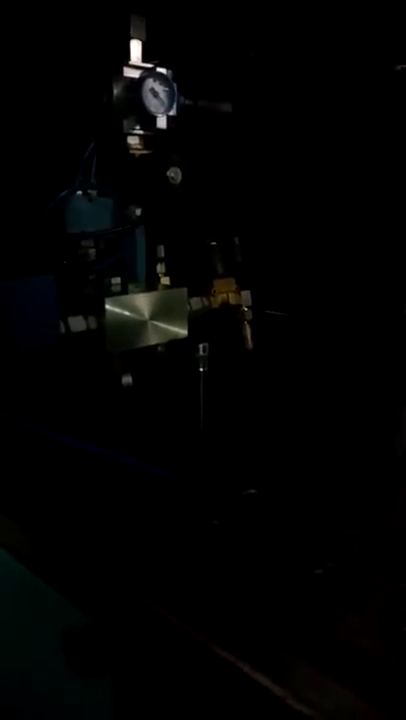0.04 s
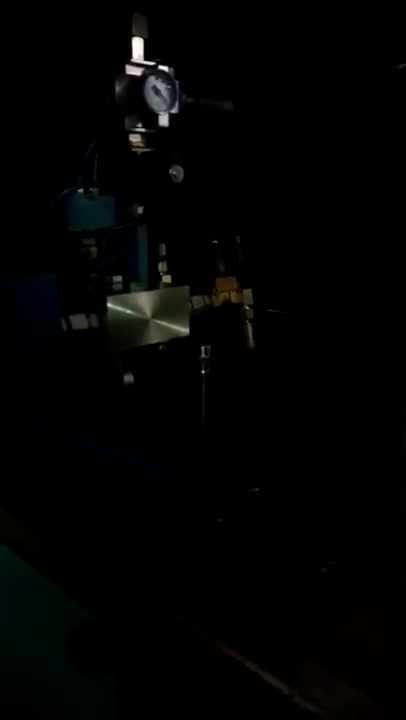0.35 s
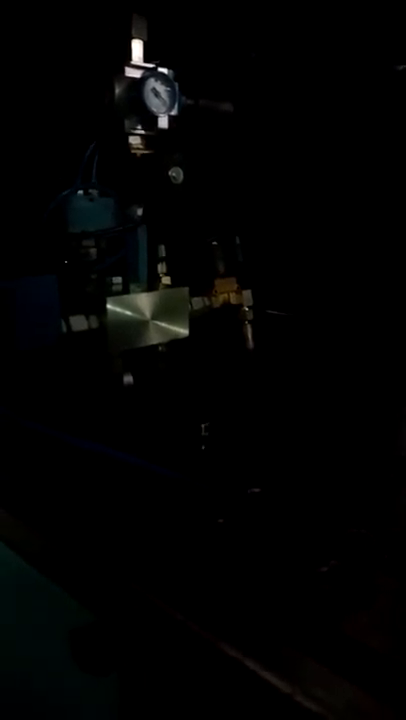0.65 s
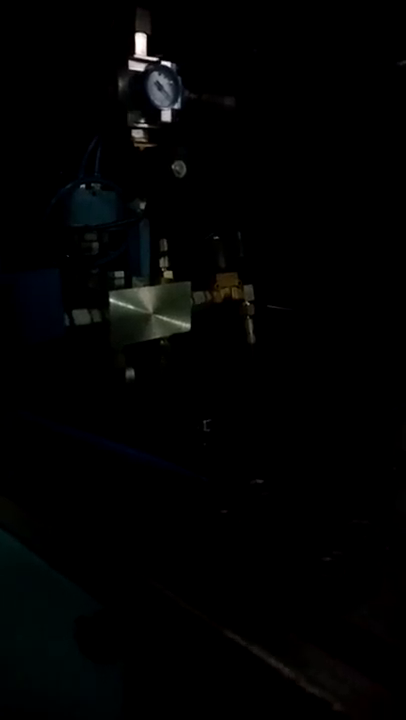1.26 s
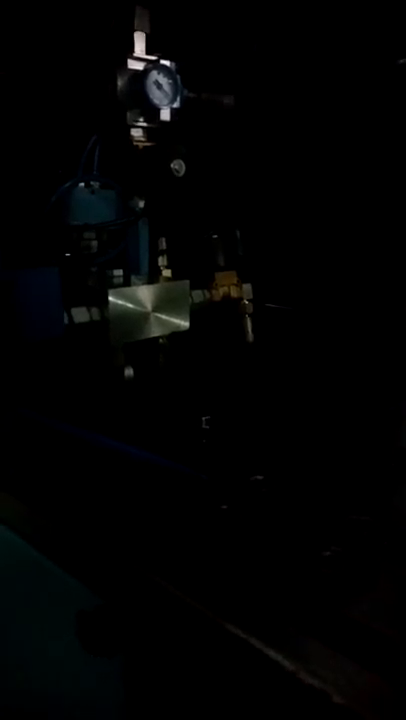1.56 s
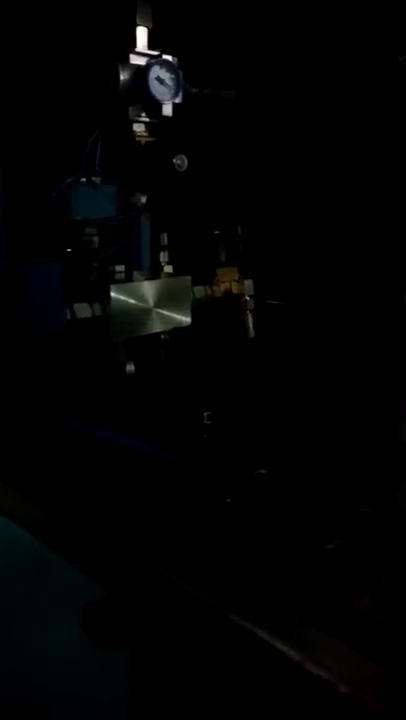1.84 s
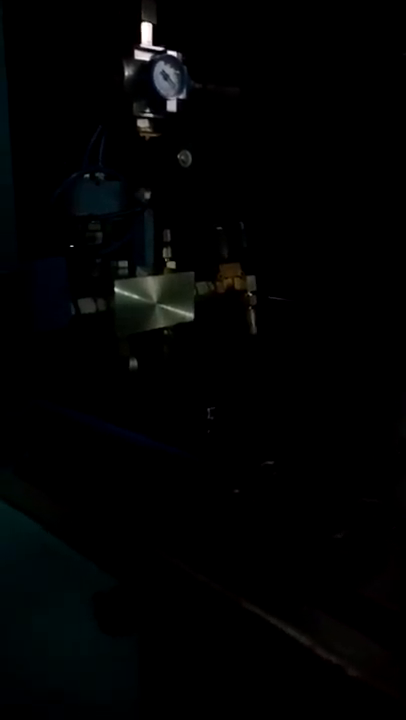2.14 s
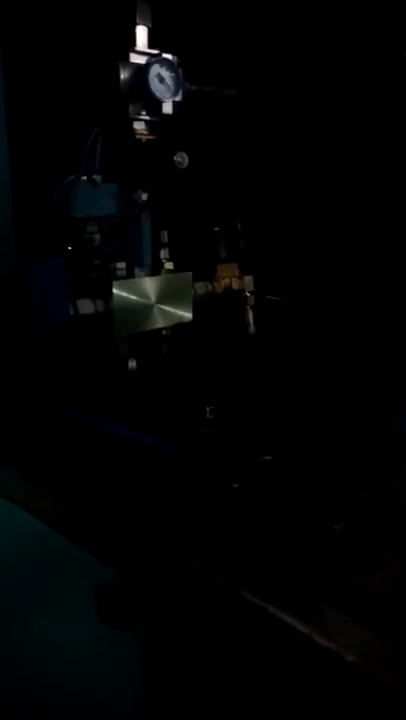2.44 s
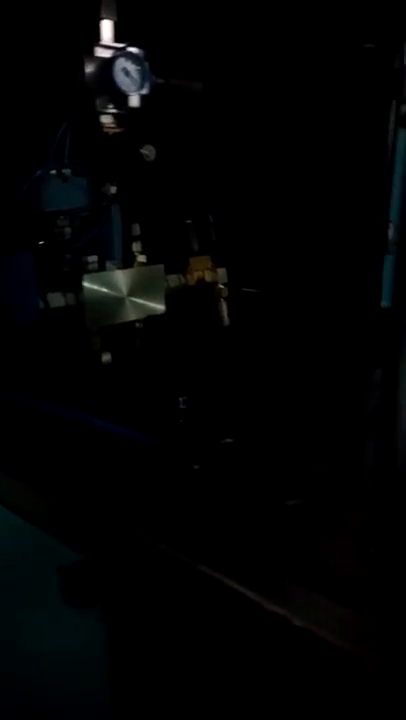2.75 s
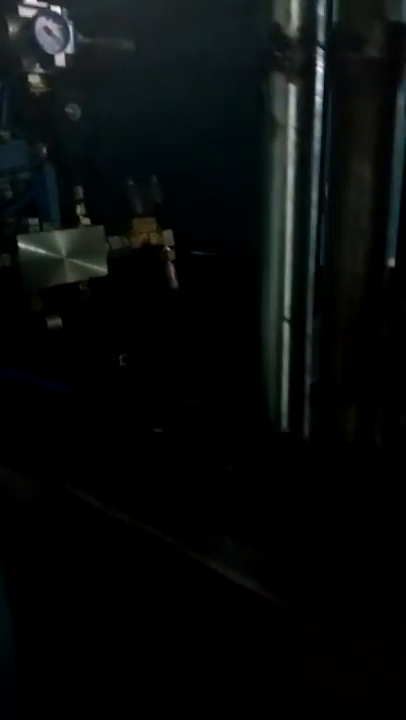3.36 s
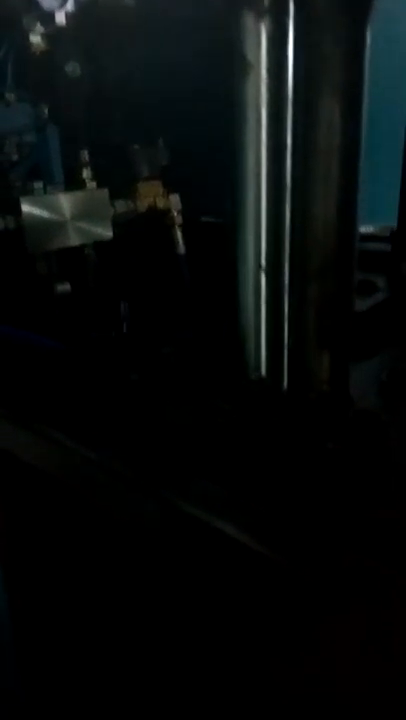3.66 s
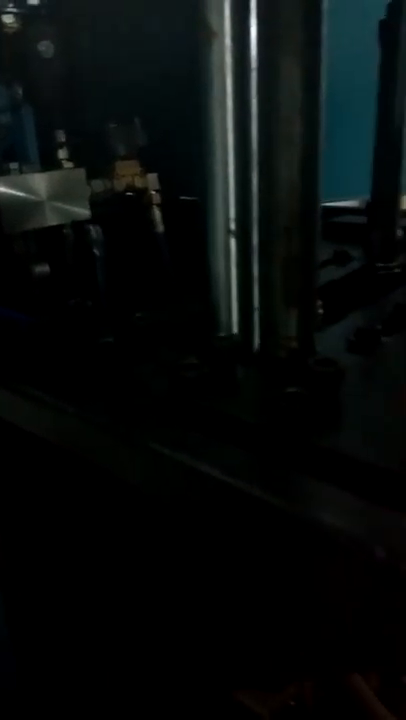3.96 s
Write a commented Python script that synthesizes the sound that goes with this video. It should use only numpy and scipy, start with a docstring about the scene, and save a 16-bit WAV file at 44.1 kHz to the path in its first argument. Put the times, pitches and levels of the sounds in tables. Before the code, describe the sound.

A pneumatic press hisses in sharp bursts and clanks over a low motor drone.

```python
"""Air rushes through pipes, then bursts hissing from valves: a pneumatic press works one cycle, close by.
The ram lands on its bed, the frame knocks and steel parts clank, each blow a short rattle and a ring.
Behind it a motor drones under load and a fitting leaks, in a reverberant factory hall.
The strongest exhaust, near the end, blows on one of the two microphone ports."""
import sys
import numpy as np
from scipy import signal
from scipy.fft import rfft, irfft
from scipy.io import wavfile

SR = 44100
rng = np.random.default_rng(int(sys.argv[2]) if len(sys.argv) > 2 else 0)


def generate_wav(signal):
    """Clip the signal to [-1, 1] and save it as 16-bit WAV at the path in sys.argv[1]."""
    frames = np.transpose(np.atleast_2d(signal))
    scaled = np.clip(frames, -1, 1) * 32767
    pcm = np.round(scaled).astype(np.int16)
    wavfile.write(sys.argv[1], SR, pcm)


N = 176400

# The dull rattle of ram and frame. Each row: frequency in Hz, relative level in dB.
THUD_SPECTRUM = [(30, -38), (70, -19), (130, -1), (210, -7), (400, 1), (600, -8), (850, -5), (1200, -9.5),
                 (1600, -9.5), (2500, -10), (4500, -18), (8000, -16), (15000, -49)]
# How long it lasts. Each row: frequency in Hz, seconds to fall 60 dB.
THUD_DECAY = [(100, 0.328), (500, 0.1525), (2000, 0.163), (10000, 0.0595)]


def amp(db):
    """Decibels to gain."""
    return 10 ** (np.asarray(db) / 20)


def unit_rms(x):
    """Scales to rms 1."""
    return x / np.sqrt(np.mean(x ** 2) + 1e-20)


def curve_at(points, hz):
    """Reads a table on a logarithmic frequency axis."""
    point_hz, value = np.transpose(points)
    return np.interp(np.log(hz + 1), np.log(point_hz + 1), value)


def fader(points):
    """Gain over the whole scene from (s, dB) points."""
    return amp(np.interp(np.arange(N) / SR, *np.transpose(points)))


def add(mix, start, sound):
    """Mixes a sound in at start seconds."""
    part = mix[:, max(round(start * SR), 0):][:, :sound.shape[1]]
    part += sound[:, :part.shape[1]]


def noise(spectrum, size, tilt_db=0):
    """Two unrelated coloured noises of rms 1, tilted by tilt_db per octave."""
    hz = np.fft.rfftfreq(size, 1 / SR)
    colour = amp(curve_at(spectrum, hz) + tilt_db * np.log2(np.maximum(hz, 100) / 1000))
    return unit_rms(irfft(rfft(rng.standard_normal((2, size))) * colour, size))


def wander(rate_hz, size):
    """Random drift of rms 1, mostly slower than rate_hz."""
    hz = np.fft.rfftfreq(size, 1 / SR)
    return unit_rms(irfft(rfft(rng.standard_normal(size)) / (1 + (hz / rate_hz) ** 2), size))


def damped(x, t60, stretch=1):
    """Lets each band die away at its own speed."""
    hz, t, bands = signal.stft(x, SR, nperseg=256)
    bands = bands * np.exp(-np.log(1000) * t / (stretch * curve_at(t60, hz)[:, None]))
    return signal.istft(bands, SR, nperseg=256)[1][:, :x.shape[1]]


def airflow(bursts, spectrum, close_s, flutter_db, flutter_hz):
    """A valve opens, the turbulent flow sags with the pressure (negative sag swells), the valve shuts."""
    out, t = np.zeros((2, N)), np.arange(SR) / SR
    for start, rise, length, db, sag, tilt in bursts:
        opening = np.minimum(t / rise, 1) * np.exp(-np.maximum(t - length, 0) / close_s)
        gain = amp(db - sag * np.minimum(t, length) + flutter_db * wander(flutter_hz, SR))
        add(out, start, opening * gain * noise(spectrum, SR, tilt))
    return out


def rattles(blows, spectrum, t60, rise_s=.00111):
    """Each blow wakes a dense, short rattle."""
    out, t = np.zeros((2, N)), np.arange(SR) / SR
    for start, db, stretch, tilt, _, _ in blows:
        rattle = damped(noise(spectrum, SR, tilt), t60, stretch)
        add(out, start, amp(db) * np.minimum(t / rise_s, 1) * rattle)
    return out


def rings(blows, modes, rise_s, focus_db, left_lag_s=.00004):
    """A blow starts all modes; the spot struck favours those near one pitch, by focus_db per octave."""
    out = np.zeros((2, N))
    t = np.maximum(np.arange(SR) / SR - np.array([[left_lag_s], [0]]), 0)
    for start, db, stretch, _, ring_db, centre_hz in blows:
        ring = 0
        for hz, mode_db, t60 in modes:
            gain = amp(mode_db - focus_db * abs(np.log2(hz / centre_hz)))
            ring += gain * np.exp(-np.log(1000) * t / (t60 * stretch)) * np.sin(2 * np.pi * hz * t)
        add(out, start, 2 * amp(db + ring_db) * np.minimum(t / rise_s, 1) * ring)
    return out


def hall(x, near_db, near_s=.0122, near_hz=1390):
    """Adds quick reflections from the machine itself, then the long tail of the hall."""
    # Each row: frequency in Hz, seconds to fall 60 dB.
    tail_t60 = [(100, 0.72), (400, 1), (1500, 0.914), (4000, 0.828), (9000, 0.56), (15000, 0.31)]
    # Each row: frequency in Hz, level in dB against the direct sound.
    tail_db = [(100, -14), (400, -10), (1500, -8), (4000, -10), (9000, -9.5), (15000, -21)]
    t, hz = np.arange(SR) / SR, np.fft.rfftfreq(SR, 1 / SR)
    echoes = rng.standard_normal((2, SR)) * (rng.random((2, SR)) < .05)
    echoes = echoes * np.exp(-t / near_s) * (t > .001)
    treble = amp(near_db) * hz / (hz - 1j * near_hz)  # small parts return only the treble
    near = (1 + treble * rfft(unit_rms(echoes)) / np.sqrt(SR)) / np.sqrt(1 + abs(treble) ** 2)
    tail = damped(rng.standard_normal((2, SR)), tail_t60) * np.minimum(t / .0201, 1)
    unit_energy = np.sqrt(2 * np.log(1000) / (SR * curve_at(tail_t60, hz)))
    tail = rfft(tail) * amp(curve_at(tail_db, hz)) * unit_energy
    return signal.fftconvolve(x, irfft(near + tail, SR), axes=1)[:, :N]


def microphone(x, airborne):
    """Two ports, alike in the bass for airborne sound; each channel subtracts the other port, delayed."""
    # Each row: frequency in Hz, delay in cycles.
    delay = [(0, 0), (2460, 1), (4980, 2), (7600, 3), (10450, 4), (13000, 5), (15400, 6), (22050, 9)]
    # Each row: frequency in Hz, share of the other port subtracted.
    crossfeed = [(20, .99), (2700, .99), (3600, .92), (5000, .55), (8000, .38), (15000, .28)]
    hz = np.fft.rfftfreq(N, 1 / SR)
    cycles = np.interp(hz, *np.transpose(delay))
    cross = np.clip(curve_at(crossfeed, hz), 0, .995)
    coherence = airborne * np.sinc(2.357 * cycles)
    blend, ports = np.arcsin(coherence) / 2, rfft(x)
    ports = np.cos(blend) * ports + np.sin(blend) * ports[::-1]
    channels = ports - cross * np.exp(-2j * np.pi * cycles) * ports[::-1]
    power = 1 + cross ** 2 - 2 * cross * coherence * np.cos(2 * np.pi * cycles)
    return irfft(channels / np.sqrt(power), N)


def room_tone():
    """The steady wash of noise in the hall."""
    # Each row: frequency in Hz, relative level in dB.
    spectrum = [(25, -24.5), (60, -7), (140, -6.5), (350, -3.5), (700, -2.5), (1300, -10.5), (2000, -1.96),
                (3500, -5.5), (5500, -16.5), (8000, -5), (11000, -17.5), (15000, -21.5)]
    return amp(-43) * noise(spectrum, N)


def motor(waver=.014, rumble_db=-1):
    """Rumble and wavering hum that follow the load."""
    # Each row: time in seconds, level in dB.
    load = [(0, -48.5), (.4, -57), (.52, -38), (.7, -35.5), (.9, -31.5), (1.2, -42), (1.75, -39.5),
            (2.05, -32.5), (2.3, -41.5), (2.78, -39), (2.98, -52.5), (3.85, -52), (4, -44.5)]
    # The rumble. Each row: frequency in Hz, relative level in dB.
    spectrum = [(25, -40.5), (60, -22), (130, -3.5), (300, -1.5), (550, -8.5), (1000, -7), (2000, -16),
                (5000, -17), (15000, -52.5)]
    # Each row: pitch in Hz, level in dB against the load level.
    tones = [(57, -14), (134.6, -13), (170, -12), (240, -16), (296, -14), (1104, -15)]
    hum = 0
    for hz, db in tones:
        pitch = hz * (1 + waver * wander(5.86, N))
        hum += amp(db) * np.sin(2 * np.pi * (np.cumsum(pitch) / SR + rng.random((2, 1))))
    return fader(load) * (amp(rumble_db) * noise(spectrum, N) + np.sqrt(2) * hum)


def leak():
    """A thin hiss from a fitting that grows as pressure builds."""
    # Each row: time in seconds, level in dB.
    swell = [(0, -35.5), (.3, -30.5), (.7, -29), (.85, -41), (1.3, -39.5), (2.1, -36.5), (2.35, -35.5),
             (2.6, -32.5), (2.77, -29.3), (2.92, -39), (3.2, -46), (4, -47)]
    # Each row: frequency in Hz, relative level in dB.
    spectrum = [(40, -28.5), (500, -10), (1000, -3), (1900, 0.5), (2950, -3), (3330, 3), (3700, -3),
                (4200, -6), (5300, -5), (7200, 0), (9000, -4), (12000, -8.5), (15000, -8.5)]
    return fader(swell) * noise(spectrum, N) * amp(.5 * wander(26, N))


def gust():
    """Exhaust air buffets the left microphone port."""
    # Start, rise and length in seconds, level in dB, sag in dB per second, tilt in dB per octave.
    burst = (3.367, 0.0034, 0.285, -12.4, 2.5, 0.2)
    # Each row: frequency in Hz, relative level in dB.
    spectrum = [(25, -17), (60, -9.5), (120, 0.5), (220, 1), (400, -5), (700, -7), (1200, -10.5),
                (2500, -20.5), (6000, -19.5), (15000, -48)]
    buffet = airflow([burst], spectrum, close_s=.013, flutter_db=1.92, flutter_hz=71.3)
    return buffet * np.array([[np.sqrt(2)], [0]])


def frame_knocks():
    """The ram knocks the frame: returns the dull rattle and the low ring."""
    # Each row: start in seconds, level in dB, length factor, rattle tilt in dB per octave,
    # ring offset in dB, favoured pitch in Hz.
    blows = [(.308, -27, .384, -6.5, -7, 130), (.925, -31.5, .92, 1, -1, 850),
             (1.351, -16.5, .8, -.9, 2, 200), (1.515, -20.5, .6, .5, 0, 220), (1.533, -31, .7, 0, 13, 318),
             (1.665, -35, 1.2, 1, 13, 318), (1.69, -36, 1, 1, 9, 318), (1.765, -38, 1, 0, 15, 318),
             (1.791, -22.5, .525, -.8, -2, 400), (2.008, -32, 1.21, -1, 2, 400),
             (2.785, -20, .85, -2, -6, 130), (3.205, -36, 1.8, -.5, -6, 400), (3.25, -15.5, .7, -1, 3, 180)]
    # Each row: pitch in Hz, level in dB, seconds to fall 60 dB.
    modes = [(133.75, -19, .4), (167.76, -22, .283), (240, -22, .3), (318, -13, .25), (371.4, -20, .116),
             (430, -18, .2), (857.8, -16, .143), (979.3, -18, .207), (1444, -16, .12)]
    return rattles(blows, THUD_SPECTRUM, THUD_DECAY), rings(blows, modes, rise_s=.004, focus_db=4.5)


def steel_clanks():
    """Steel strikes steel: returns the hard crack and the bright ring."""
    # Rows as for the blows in frame_knocks.
    blows = [(1.025, -20.5, .103, 3.5, -27, 1600), (1.539, -16.5, .5, -.3, 1, 1900),
             (1.548, -23, .5, 2, 4, 2000), (1.681, -31, 1, -.5, 8, 1550), (1.715, -35, .8, 0, 9, 1550),
             (2.7955, -12.5, .5, 1, 7.5, 3350), (2.802, -15.5, 1, -1.2, 6, 1500),
             (3.252, -26, 1.54, 1.5, -14, 1600)]
    # Each row: frequency in Hz, relative level in dB.
    crack = [(60, -33), (400, -25.5), (800, -4), (1200, -9), (1650, 2.5), (2300, -7), (2900, -5),
             (3400, -6), (4200, -26.5), (8500, -18), (15000, -25)]
    # Each row: frequency in Hz, seconds to fall 60 dB.
    crack_t60 = [(200, 0.414), (1500, 0.273), (4000, 0.178), (12000, 0.164)]
    # Each row: pitch in Hz, level in dB, seconds to fall 60 dB.
    modes = [(1098, -20, .3), (1495, -16, .18), (1600, -8.5, .11), (1690, -13, .09), (1830, -18, .06),
             (2050, -21, .04), (3025, -26, .3), (3290, -12, .085), (3365, -13, .07)]
    return rattles(blows, crack, crack_t60), rings(blows, modes, rise_s=.0022, focus_db=9)


def ram_landing():
    """The ram lands and rebounds: returns the thud and the ring of the bed."""
    # Rows as for the blows in frame_knocks.
    blows = [(.675, -12.5, .9, 1.4, 1, 480), (.682, -16, .7, 1, -12, 980), (.692, -19, .7, 1.5, -7, 980),
             (.703, -18, .9, 1, -3, 200), (.724, -28, 2.7, 0, -4, 300)]
    # Each row: pitch in Hz, level in dB, seconds to fall 60 dB.
    modes = [(134.6, -19, .8), (176, -9, .14), (241, -26, 1.8), (365, -13, .08), (402, -8, .11),
             (442, -10, .09), (545, -21, .14), (858, -14, .13), (985, -10, .16), (1470, -14, .09)]
    return rattles(blows, THUD_SPECTRUM, THUD_DECAY), rings(blows, modes, rise_s=.006, focus_db=2.5)


def pipe_rush():
    """Air fills the cylinder through the pipes with a dark rush."""
    # Each row: start, rise and length in seconds, level in dB, sag in dB per second,
    # tilt in dB per octave.
    bursts = [(0, 0.00082, 0.287, -25, -4, -0.48), (1.79, 0.0178, 0.166, -21, 32.5, -0.46)]
    # Each row: frequency in Hz, relative level in dB.
    spectrum = [(30, -37), (70, -16.5), (130, -3), (200, -3), (350, 0.5), (600, -5), (900, -2), (1500, -10),
                (2400, -11), (4000, -20), (8000, -26), (15000, -31)]
    return airflow(bursts, spectrum, close_s=.019, flutter_db=.97, flutter_hz=74)


def valve_exhaust():
    """Air jets out of the valves in bright, hissing bursts."""
    # Rows as for the bursts in pipe_rush.
    bursts = [(.305, 0.0257, 0.46, -16, 41, -0.68), (.69, 0.0045, 0.0342, -21.5, 41.5, -2.5),
              (.988, 0.0044, 0.0134, -35, 150, 3), (1.022, 0.0045, 0.035, -18.5, 901.5, 1.42),
              (1.35, 0.0055, 0.49, -19.5, 27, -0.76), (1.79, 0.0293, 0.1468, -19, 20.5, -0.67),
              (1.93, 0.028, 0.13, -26.5, 58, -2.25), (2.785, 0.0023, 0.0104, -17, 102, 2.66),
              (2.81, 0.0056, 0.0697, -21.5, 112.5, 0.5), (3.19, .02, 0.18, -28, 31.5, .9),
              (3.362, 0.0098, 0.2918, -8.5, -2.5, 1.4), (3.66, 0.0286, .34, -21.5, 35.5, -0.51)]
    # Each row: frequency in Hz, relative level in dB.
    spectrum = [(40, -42), (200, -35), (600, -8.5), (1000, -5), (2000, -0.5), (3300, 0), (4100, -1.5),
                (4900, .5), (6500, -3), (8500, -3.5), (12000, -6.5), (15000, -10)]
    return airflow(bursts, spectrum, close_s=.03, flutter_db=1.0059, flutter_hz=59)


def scene():
    """The press in its hall, plus the gust on one port."""
    air = valve_exhaust() + pipe_rush()
    hits, ringing = np.sum([ram_landing(), frame_knocks(), steel_clanks()], axis=0)
    press = hall(air + hits + leak(), near_db=-2)
    press += hall(ringing, near_db=-9)  # weak near reflections keep each ringing pitch clear and even
    sound = press + motor() + room_tone()
    return microphone(sound, airborne=True) + microphone(gust(), airborne=False)


def record(dry, ceiling=1.197, cutoff_hz=15600):
    """Unequal channel colour, soft overload and the band limit."""
    # Each row: frequency in Hz, left minus right in dB.
    balance = [(100, 0.5), (1000, -.5), (1700, -3), (2250, -0.5), (2750, 0), (5000, -1.27), (8500, 1),
               (11000, -2), (13000, -4.5), (15000, -2.5)]
    lean_db = curve_at(balance, np.fft.rfftfreq(N, 1 / SR))
    coloured = irfft(rfft(dry) * amp(np.array([lean_db, -lean_db]) / 2), N)
    saturated = coloured / (1 + (coloured / ceiling) ** 4) ** (1 / 4)
    lowpass = signal.firwin(401, cutoff_hz, window=("kaiser", 8), fs=SR)
    return signal.oaconvolve(saturated, lowpass[None], "same")


dry = scene()
out = record(dry)
generate_wav(out)
```